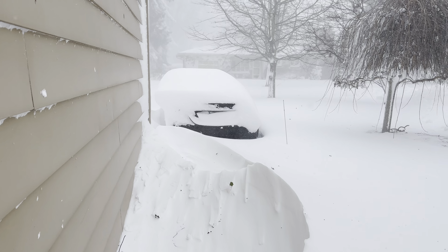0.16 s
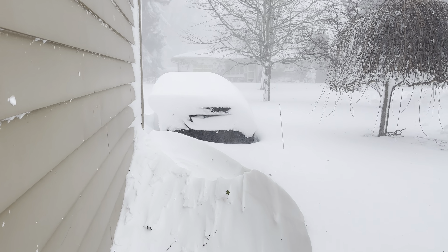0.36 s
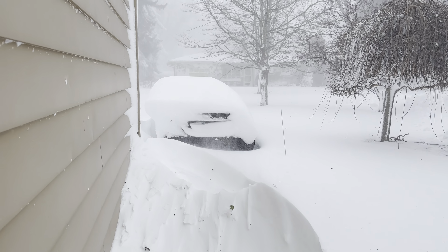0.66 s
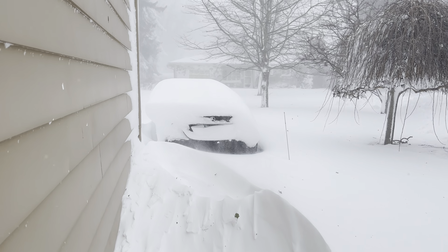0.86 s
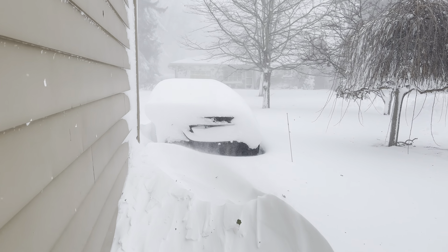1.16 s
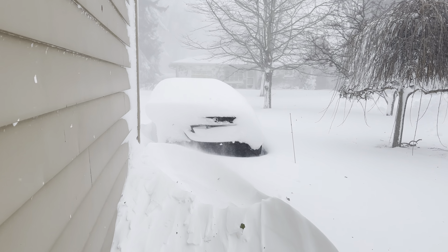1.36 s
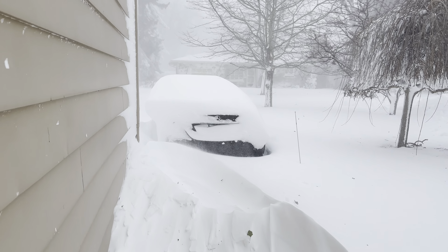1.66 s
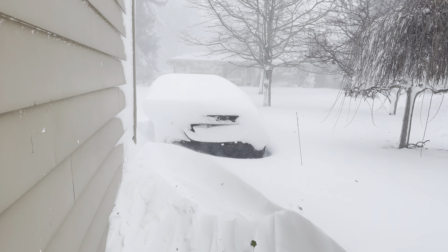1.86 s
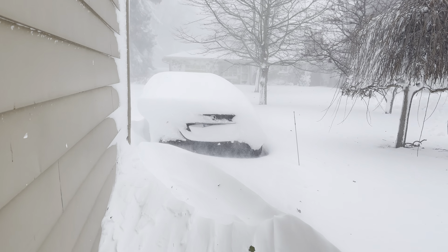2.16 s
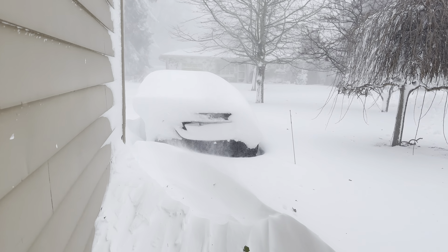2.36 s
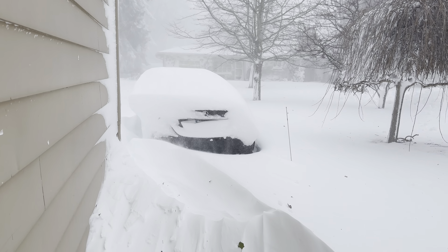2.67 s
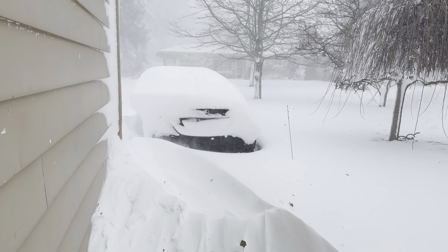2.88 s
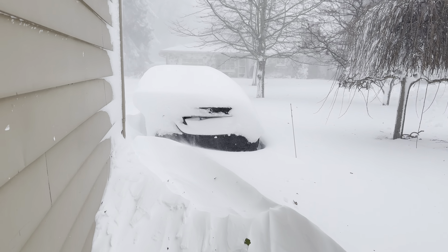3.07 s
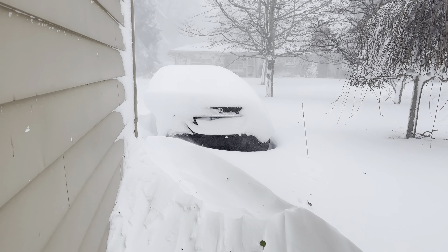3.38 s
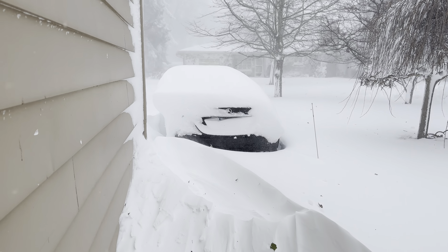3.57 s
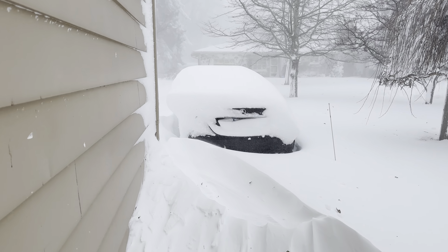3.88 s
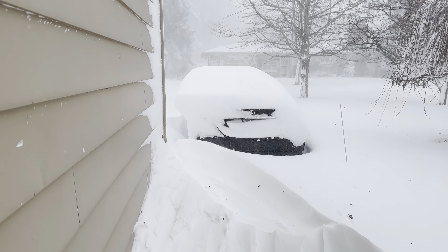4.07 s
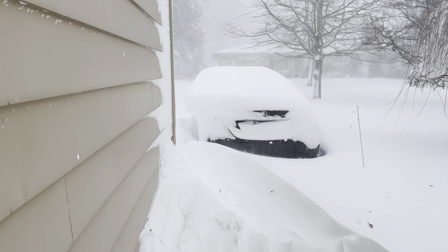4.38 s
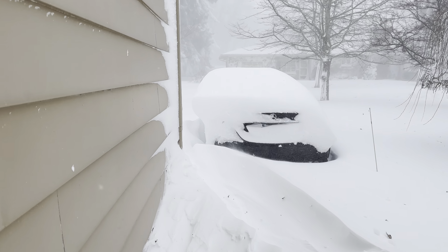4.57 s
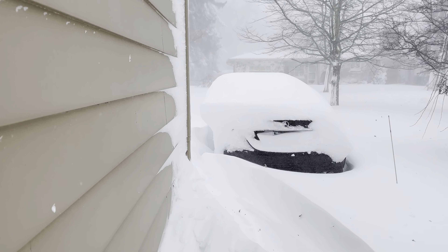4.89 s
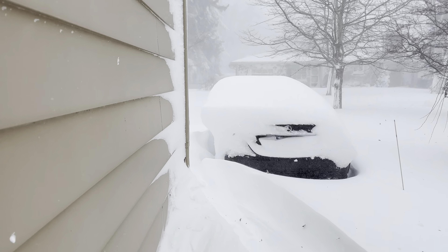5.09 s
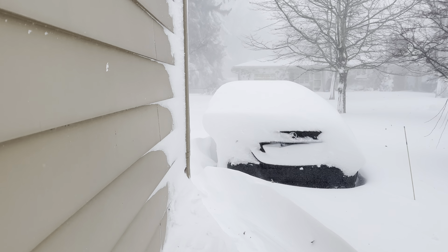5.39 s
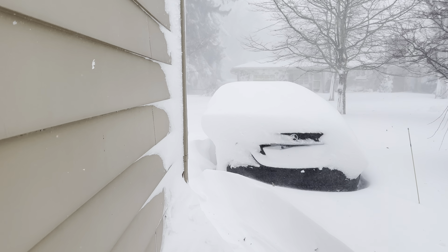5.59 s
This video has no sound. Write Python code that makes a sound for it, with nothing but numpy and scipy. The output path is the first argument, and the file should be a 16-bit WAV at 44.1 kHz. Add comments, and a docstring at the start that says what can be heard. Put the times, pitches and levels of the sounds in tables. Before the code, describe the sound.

Storm wind buffets a microphone outdoors beside a house wall, close and uneven, with low thumps, flutter and short rasping puffs. It rumbles from the start and surges at about 0.5 seconds, with the hardest slaps around 0.7 to 0.9. Lumpy gusts continue, dip near 1.5, return from 1.7 to 2, then ease until about 2.6. A second strong stretch peaks around 3.1 to 3.4, with another thump at 3.8. Between 3.9 and 4.5 the air makes a faint, hollow, flickering whistle that sinks in pitch. The buffeting continues and picks up again from 5.3 to the end near 5.7. A few flakes tick softly on the casing, around 0.7, 1.5, 4.6 and 5.7. Far behind, the storm roars quietly and steadily in bare trees, and blown snow hisses faintly along a drift, swelling briefly at about 5 seconds.

```python
"""Snowstorm gusts buffet the two ports of a microphone standing beside a house wall.
Eddies right on the ports make thumps, flutter, slaps and short rasping puffs, and air crossing
a port opening gives a brief hollow whistle. A few flakes tick on the casing.
Farther off, blown snow hisses along the drift and the storm roars in bare trees."""
import sys
import numpy as np
from scipy.fft import rfft, irfft, next_fast_len
from scipy.io import wavfile
from scipy.ndimage import uniform_filter1d, map_coordinates

SR = 44100
rng = np.random.default_rng(int(sys.argv[2]) if len(sys.argv) > 2 else 0)


def transcribe(signal):
    """Save signal, clipped to [-1, 1], as a 16-bit WAV file at the path in sys.argv[1]."""
    frames = np.atleast_2d(signal).T
    limited = np.clip(frames, -1, 1)
    pcm = np.round(limited * 32767).astype(np.int16)
    wavfile.write(sys.argv[1], SR, pcm)


N = 253134
TIME_S = np.arange(N) / SR


def amp(db):
    """Gain of a level in dB."""
    return 10 ** (np.asarray(db) / 20)


def unit_rms(x):
    """Scaled so that the mean of the channels has rms 1."""
    return x / np.sqrt(np.mean(x.mean(axis=0) ** 2) + 1e-20)


def at_hz(rows, hz):
    """Each column after the frequency, read on a log axis."""
    knots_hz, *columns = np.transpose(rows)
    return [np.interp(np.log(hz + 1), np.log(knots_hz + 1), column) for column in columns]


def curves(rows):
    """One value per sample for each column after the time."""
    knots_s, *columns = np.transpose(rows)
    return [np.interp(TIME_S, knots_s, column) for column in columns]


def bell(peak_s, half_s):
    """A Gaussian swell of height 1."""
    return np.exp(-((TIME_S - peak_s) / half_s) ** 2 / 2)


def wobble(rate):
    """A smooth random curve, rate knots a second."""
    knots = rng.standard_normal(int(N * rate / SR) + 4)
    return map_coordinates(knots, [TIME_S * rate])


def filtered(x, response):
    """x through a complex frequency response."""
    size = next_fast_len(N + SR // 2)
    return irfft(rfft(x, size) * response(np.fft.rfftfreq(size, 1 / SR)), size)[..., :N]


def lean(left_db):
    """Left and right gains for a left-minus-right level."""
    return amp([left_db / 2, -left_db / 2])


# How the two microphone ports relate: freq_hz, likeness (0-1), left_lag_rad, left_louder_db
PORT_PAIR = [(35, 0.77, 0.36, -2), (78.6, 1, 0.74, -2), (201, 0.57, 0.96, -1), (449, 0.6, 1.62, 5.5),
             (890, 0.61, 3.9, 1.5), (1340, 0.18, 2.48, 1.5), (2170, 0, 0.84, 1), (3440, 0.42, 4.82, 1),
             (5430, 0, 3.1, 7), (9200, 0.47, 5.03, -1), (14900, 1, 0.38, 0)]


def port_noise(spectrum, drive):
    """Coloured noise at unit rms, shaped by drive, partly shared by the ports and lagging on the left."""
    def response(hz):
        likeness, lag_rad, left_db = at_hz(PORT_PAIR, hz)
        angle = np.arccos(np.clip(likeness, 0, 1)) / 2
        both, apart = np.cos(angle), np.sin(angle)
        mix = np.array([[both, apart], [both, -apart]])
        sides = lean(left_db) * np.exp([-.5j * lag_rad, .5j * lag_rad])
        return amp(at_hz(spectrum, hz)[0]) * sides[:, None] * mix
    noise = drive * rng.standard_normal((2, N))
    return unit_rms(filtered(noise, response).sum(axis=1))


# Colour of the distant trees, heard from the wall: freq_hz, density_db
ROAR_SPECTRUM = [(60, -2.5), (120, -11), (390, -28), (550, -17.5), (690, -26), (1100, -23.5), (1900, -19),
                 (2550, -22), (2900, -27), (4500, -32), (5900, -62)]
# Their slow swell at the microphone: time_s, level_db
ROAR_LEVELS = [(0, -48.5), (.5, -47), (1.3, -49), (2.5, -45), (3.1, -45.5), (3.9, -47.5), (4.6, -47),
               (5.1, -48.5), (5.74, -45.5)]


def tree_roar():
    """The storm blows through far bare trees with a smooth roar."""
    return amp(curves(ROAR_LEVELS)[0]) * port_noise(ROAR_SPECTRUM, amp(1.15 * wobble(13)))


# Colour of the snow out on the drift, its hiss and its finest treble: freq_hz, density_db
HISS_SPECTRUM = [(1650, -3), (3110, -2.5), (6150, -0.5), (7210, -5.5), (7920, -3.5), (8870, -6),
                 (10000, -9.5), (11500, -30), (15000, -62.5)]
FINE_SPECTRUM = [(6760, -38), (11500, -11), (13200, 9), (15100, 6.5), (15700, 4)]
# Steady blowing along the drift: time_s, hiss_db
DRIFT_LEVELS = [(0, -60.5), (.5, -62.5), (1.2, -62.5), (2.5, -62.5), (3.0, -59), (3.9, -63.5), (4.6, -58.5),
                (5.3, -61), (5.74, -57.5)]
# Sheets of snow sweeping past the microphone: peak_s, hiss_db, fine_db, half_length_s
SNOW_SHEETS = [(0.0, -66, -70, 0.087), (0.49, -68, -74, 0.12), (1.524, -77, -72, .05),
               (2.968, -84, -84.5, 0.1), (4.725, -69, -73.5, 0.027), (5.006, -56.5, -64.5, 0.072),
               (5.627, -64, -62, 0.062)]


def blown_snow():
    """Blown snow hisses in small waves and swells as each sheet passes."""
    hiss_gain = amp(curves(DRIFT_LEVELS)[0])
    fine_gain = amp(-80.5)  # between sheets
    for peak_s, hiss_db, fine_db, half_s in SNOW_SHEETS:
        hiss_gain += amp(hiss_db) * bell(peak_s, half_s)
        fine_gain += amp(fine_db) * bell(peak_s, half_s)
    wave = wobble(12)
    hiss = hiss_gain * port_noise(HISS_SPECTRUM, amp(0.93 * wave + 0.71 * wobble(60)))
    fine = fine_gain * port_noise(FINE_SPECTRUM, amp(1.3 * wave + 1.3 * wobble(40)))
    return hiss + fine


# Flakes landing on the microphone casing: start_s, strike_db, left_louder_db
FLAKE_HITS = [(0.614, -48.5, 4.5), (0.689, -38.5, 4), (1.524, -39, 1), (4.569, -40, 2.5), (5.678, -44, 11)]


def flake_ticks(centre_hz=6500, width_hz=7000):
    """Each flake strikes the casing with a soft dry tick, gone in a few milliseconds."""
    def band_pass(hz):
        return 1j * hz * width_hz / (centre_hz ** 2 - hz ** 2 + 1j * hz * width_hz)
    out = np.zeros((2, N + SR))
    t = np.arange(600) / SR
    envelope = amp(-60 * t / .012) * (1 - np.exp(-t / .0005))
    for start_s, strike_db, left_db in FLAKE_HITS:
        tick = rng.standard_normal((2, len(t))) * envelope
        out[:, round(start_s * SR):][:, :len(t)] += amp(strike_db) * lean(left_db)[:, None] * tick
    return filtered(out[:, :N], lambda hz: band_pass(hz) ** 2)


# Spurts of air right across a port opening: peak_s, level_db, pitch_hz
WHISTLE_SPURTS = [(3.881, -56, 1185), (3.931, -47.5, 1060), (4.12, -54, 897), (4.17, -48, 858),
                  (4.34, -54, 795), (4.52, -52, 942)]


def port_whistle(bandwidth_hz=420, fade_db_per_s=220):
    """Air crossing a port whistles: narrow noise gliding from one spurt's pitch to the next."""
    pitch_hz = curves(WHISTLE_SPURTS)[1]
    gain = sum(amp(db - fade_db_per_s * abs(TIME_S - peak_s)) for peak_s, db, _ in WHISTLE_SPURTS)
    phase = 2 * np.pi * np.cumsum(pitch_hz) / SR
    tone = [wobble(bandwidth_hz) * np.cos(phase) + wobble(bandwidth_hz) * np.sin(phase) for _ in "LR"]
    flicker = amp(3.9 * wobble(60))
    return gain * flicker * unit_rms(np.array(tone))


SIDE_SPREAD_DB = 2  # how far one slap or puff favours a port


def add_eddy(out, peak_s, db, hz, left_db, cycles, unsteady):
    """Adds a few swings of air under a bell, with a wandering phase; the left port gets them later."""
    t = np.arange(SR // 8) / SR
    from_peak = t * hz / cycles - 2  # in rise times
    steps = rng.standard_normal((2, len(t))) * (from_peak > -1)
    wander = steps.cumsum(axis=1) * unsteady * np.sqrt(hz / SR)
    wander = uniform_filter1d(uniform_filter1d(wander, size=20), size=20)
    lag_rad = at_hz(PORT_PAIR, hz)[1]
    phase = 2 * np.pi * (hz * t + rng.random()) + wander - [[lag_rad], [0]]
    envelope = amp(db) * np.exp(-(from_peak / .72) ** 2 / 2)
    start = round((peak_s - 2 * cycles / hz) * SR)
    out[:, start:][:, :len(t)] += lean(left_db)[:, None] * envelope * np.sin(phase)


# Big single eddies hitting the microphone: peak_s, level_db, pitch_hz
EDDY_SLAPS = [(0.076, -27, 104), (0.246, -23.5, 114), (0.519, -34, 206), (0.658, -30, 160),
              (0.733, -11.5, 295), (0.776, -32, 169), (0.804, -18.5, 93), (0.839, -19, 182),
              (0.848, -23, 139), (0.985, -21, 102), (1.083, -25, 125.5), (1.162, -25, 169),
              (1.271, -22, 133), (1.285, -17, 142.5), (1.344, -19.5, 132.4), (1.7, -22.5, 195),
              (1.761, -18.5, 155), (1.832, -17.5, 97), (1.886, -21, 94), (1.945, -18, 149),
              (1.985, -20.5, 236), (2.67, -17, 118.4), (2.846, -17.5, 119), (3.053, -20, 269),
              (3.076, -15.5, 165), (3.094, -16.5, 103.3), (3.129, -19.5, 137.5), (3.198, -23, 198),
              (3.252, -22, 222), (3.274, -16, 199), (3.321, -12.5, 93.3), (3.342, -17.5, 105.5),
              (3.488, -23, 107), (3.655, -18.5, 107), (3.797, -18, 101.7), (3.936, -26, 300),
              (4.539, -23, 141), (4.551, -25, 133), (4.63, -25, 210), (4.664, -21, 107),
              (4.711, -25.5, 158), (4.737, -22, 175), (4.81, -30.5, 232), (4.921, -23, 100),
              (5.079, -24.5, 218), (5.127, -21, 195), (5.444, -19.5, 123), (5.563, -19.5, 99),
              (5.602, -17, 247), (5.649, -19, 245)]


def slaps():
    """A big eddy slaps the ports and swings for a cycle or two."""
    out = np.zeros((2, N + SR))
    for peak_s, db, hz in EDDY_SLAPS:
        left_db = SIDE_SPREAD_DB * rng.standard_normal()
        add_eddy(out, peak_s, db, hz, left_db, cycles=0.92, unsteady=0.55)
    return out[:, :N]


def small_puffs(rasp_db, count=60):
    """Rows like LOUD_PUFFS at random moments, riding a little above the wind's rasp."""
    peaks = rng.integers(SR // 10, N, count)
    size, pitch = rng.standard_normal((count, 2)).T
    level_db = rasp_db[peaks] + 4.5 + 2 * size
    pitch_hz = 900 * np.exp(.25 * pitch)
    return list(zip(peaks / SR, level_db, pitch_hz, np.full(count, 2.6)))


# The loudest sudden puffs across a port: peak_s, level_db, pitch_hz, rise_cycles
LOUD_PUFFS = [(0.452, -32, 1144, 3.3), (0.47, -37, 790, 3.7), (0.49, -34, 880, 3.3), (0.516, -28, 795, 3.3),
              (0.56, -34, 740, 3.5), (0.615, -28.5, 1420, 2.1), (0.637, -33, 1550, 2.1),
              (0.651, -27, 946, 4.05), (0.733, -22, 515, 1.95), (0.743, -20.5, 897, 3.25),
              (0.753, -26.5, 1310, 2.6), (0.768, -29, 748, 6.1), (0.783, -33, 840, 4),
              (0.791, -32, 1900, 2.5), (0.838, -21.5, 1265, 4), (0.85, -29, 1250, 3.3),
              (0.99, -33.5, 866, 2), (1.12, -32, 996, 6.3), (1.153, -33, 1134, 5.9), (1.28, -31, 1064, 3.6),
              (1.678, -35, 1100, 2.34), (1.806, -32.5, 725, 2.6), (1.826, -29, 745, 2.9),
              (1.865, -30.5, 668, 2.8), (1.887, -26, 995, 2.3), (1.901, -31.5, 1065, 2.6),
              (1.941, -29.5, 948, 2.3), (2.138, -36, 1000, 2.9), (2.188, -34.5, 623, 3),
              (2.363, -33, 767, 1.98), (2.456, -36, 1105, 3), (2.76, -39, 935, 3.07),
              (3.056, -31, 744, 2.2), (3.114, -33, 935, 2.6), (3.147, -33, 804, 2.4),
              (3.17, -32.5, 653, 4.5), (3.194, -27, 980, 1.7), (3.22, -31, 752, 6.5),
              (3.247, -27.5, 980, 2.3), (3.274, -29, 857, 3.5), (3.287, -26.5, 1160, 2.9),
              (3.303, -30, 800, 3.7), (3.315, -26, 1103, 3.2), (3.598, -34, 680, 2.8),
              (3.912, -28.5, 1082, 4.5), (3.95, -30, 1000, 3.3), (3.987, -38, 996, 6.7),
              (4.036, -29, 1010, 3.8), (4.048, -28.5, 1013, 4.56), (4.128, -39, 880, 4.8),
              (4.182, -34.5, 846, 4.2), (4.265, -30.5, 920, 4.3), (4.364, -33.5, 866, 4.1),
              (4.49, -32.5, 948, 6.6), (4.611, -34, 910, 2.2), (5.062, -33.5, 1124, 2.9),
              (5.167, -35, 740, 4.7), (5.299, -28.5, 1070, 5), (5.321, -32, 1030, 2.1),
              (5.332, -37, 1210, 3.2), (5.512, -37.5, 900, 4.1), (5.602, -38, 1240, 4.5)]


def puffs(rasp_db):
    """A puff is a brief swirl, steadier the longer it lasts, with a tearing edge above and a push below."""
    out = np.zeros((2, N + SR))
    for peak_s, db, hz, cycles in LOUD_PUFFS + small_puffs(rasp_db):
        left_db = SIDE_SPREAD_DB * rng.standard_normal()
        add_eddy(out, peak_s, db, hz, left_db, cycles, unsteady=2.5 / np.sqrt(cycles))
        add_eddy(out, peak_s, db - 20, 1.7 * hz, left_db, 1.6 * cycles, unsteady=1.4)  # edge
        add_eddy(out, peak_s, db - 0.4, 0.426 * hz, left_db, 0.41 * cycles, unsteady=1.59)  # push
    return out[:, :N]


# Colour of big, middling and small eddies on the microphone: freq_hz, density_db
THUMP_SPECTRUM = [(15, -51), (28, -29), (36, -16), (48, -3.5), (65, 3.5), (100, -1.5), (170, -10),
                  (260, -18), (500, -86)]
FLUTTER_SPECTRUM = [(80, -20), (150, -0.5), (200, -3.5), (300, -4), (450, -9.5), (650, -16.5), (1000, -28),
                    (2000, -95)]
RASP_SPECTRUM = [(300, -0.5), (550, 3.5), (750, 1.5), (1100, -3), (1600, -9), (2500, -23), (3000, -24),
                 (8000, -68)]
# Wind right at the ports: time_s, thump_db, flutter_db, rasp_db
GUST_LEVELS = [(0, -32.5, -46, -44.5), (.27, -34, -40, -42.5), (.36, -47.5, -56, -45.5),
               (.45, -48, -47, -36), (.5, -30, -30, -36.5), (.57, -29, -32.5, -39.5),
               (.655, -31.5, -28.5, -34.5), (.7, -28.5, -37, -43), (.745, -24, -25.5, -35),
               (.78, -27, -29, -39), (.82, -24, -30.5, -36.5), (.845, -23, -35, -30.5),
               (.875, -29.5, -36.5, -41.5), (1.0, -31, -39.5, -44), (1.14, -31.5, -36.5, -36),
               (1.2, -29, -42, -45), (1.28, -31, -34.5, -42), (1.37, -23.5, -38, -46),
               (1.46, -43.5, -45, -47.5), (1.66, -50.5, -60, -43), (1.71, -25, -31, -41),
               (1.97, -29.5, -41, -48.5), (2.04, -35.5, -46.5, -50), (2.51, -50.5, -50.5, -48),
               (2.65, -32.5, -39.5, -45), (2.95, -34, -37.5, -46.5), (3.08, -29, -30.5, -45.5),
               (3.17, -29, -30.5, -42), (3.25, -28, -28.5, -42), (3.31, -24.5, -21.5, -39),
               (3.36, -26.5, -44, -48.5), (3.66, -32, -37, -54), (3.8, -23.5, -36, -50),
               (4.05, -47.5, -42.5, -48.5), (4.15, -33, -45.5, -49), (4.35, -30.5, -37.5, -49),
               (4.56, -33, -36, -41), (4.72, -32.5, -32, -46), (4.77, -39, -42.5, -49),
               (4.82, -40, -30.5, -49), (4.87, -39, -42, -44), (4.93, -31.5, -51, -44.5),
               (5.04, -42, -45, -48), (5.12, -35, -40, -46), (5.3, -27, -34.5, -42.5),
               (5.37, -29, -39, -47.5), (5.74, -32.5, -38, -49.5)]
# The side the gust leans on, by eddy size: time_s, big_left_louder_db, small_left_louder_db
GUST_LEAN = [(0, 0.5, -4), (.7, 2, -0.5), (1.3, -0.5, -1.5), (1.8, -7, 0.5), (2.3, 0, -2), (2.8, -3, -2),
             (3.7, -2, 0), (4.2, -1, -2), (5.1, -1.5, -3), (5.74, 0.5, -1.5)]
# Moments when the air lets go of the ports: centre_s, depth_db, half_length_s
GUST_LULLS = [(0.133, 11, 0.02), (0.604, 38, 0.017), (3.007, 12, 0.014), (3.715, 13, 0.015),
              (4.49, 12, 0.019), (1.799, 17.5, 0.01), (5.055, 6, 0.014), (5.7, 17, 0.0065)]


def wind_buffet():
    """Gusts hit the ports in lumps: one shared by all eddy sizes, and faster ones for smaller eddies."""
    thump_db, flutter_db, rasp_db = curves(GUST_LEVELS)
    big_lean, small_lean = map(lean, curves(GUST_LEAN))
    lull_db = sum(depth_db * bell(centre_s, half_s) for centre_s, depth_db, half_s in GUST_LULLS)
    shared = wobble(21.844)

    def lumps(shared_db, own_db, rate):
        return amp(shared_db * shared + own_db * wobble(rate))
    thump = amp(thump_db) * port_noise(THUMP_SPECTRUM, lumps(0.38, 2.05, rate=35))
    flutter = amp(flutter_db) * port_noise(FLUTTER_SPECTRUM, lumps(1.2, 3.5, rate=90))
    rasp = amp(rasp_db) * port_noise(RASP_SPECTRUM, lumps(0.9, 3.2, rate=150))
    wind = amp(-lull_db) * (big_lean * thump + small_lean * flutter)
    wind += amp(-0.26 * lull_db) * small_lean * rasp  # the rasp dips less in a lull
    return wind + big_lean * slaps() + small_lean * puffs(rasp_db)


def scene():
    """Wind, whistle and flakes on the microphone, with the trees and the drift behind."""
    return wind_buffet() + port_whistle() + tree_roar() + blown_snow() + flake_ticks()


def record(dry, top_hz=15760):
    """The recorder keeps nothing above its band limit."""
    return filtered(dry, lambda hz: hz < top_hz)


dry = scene()
out = record(dry)
transcribe(out)
```